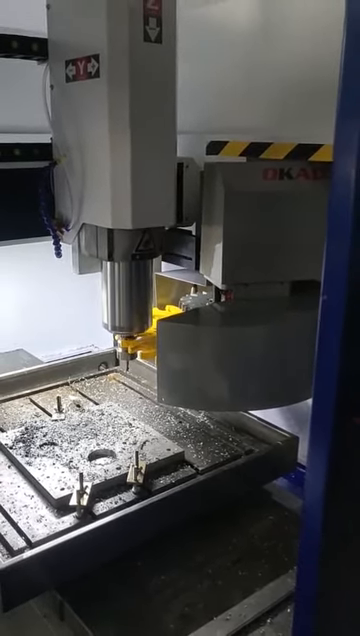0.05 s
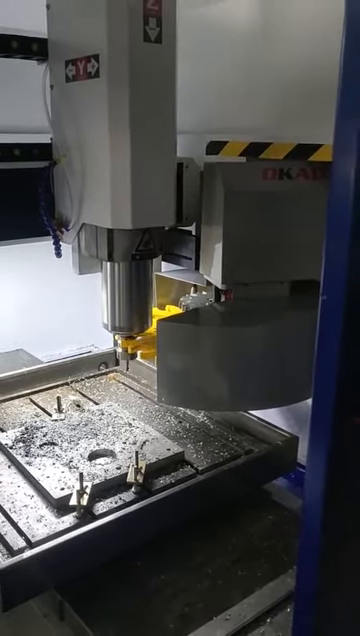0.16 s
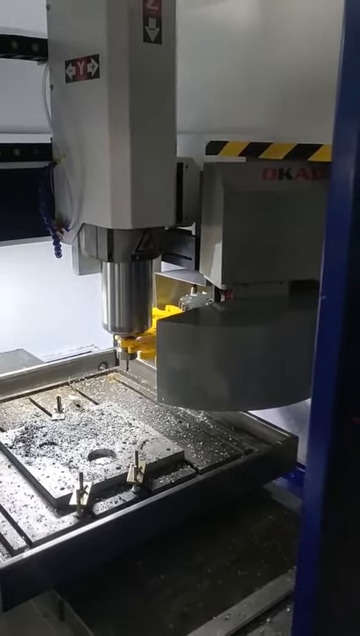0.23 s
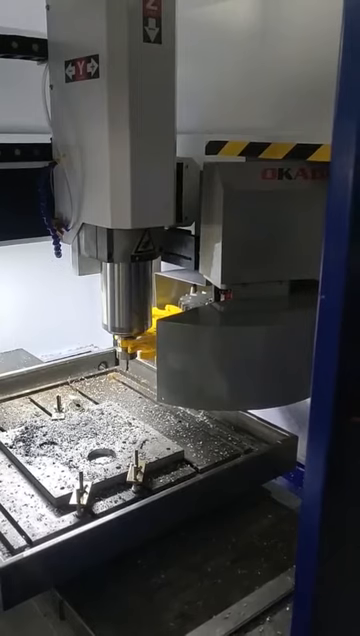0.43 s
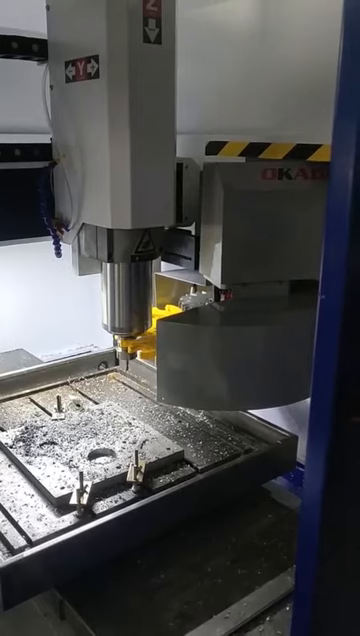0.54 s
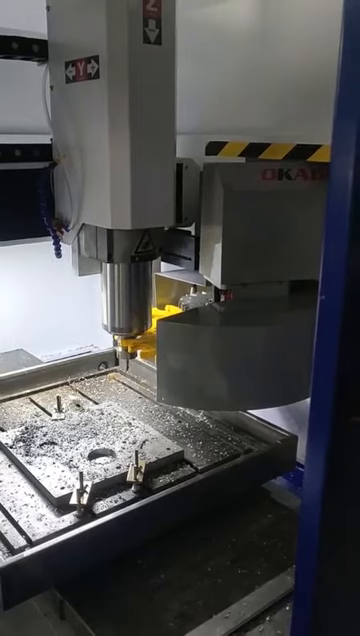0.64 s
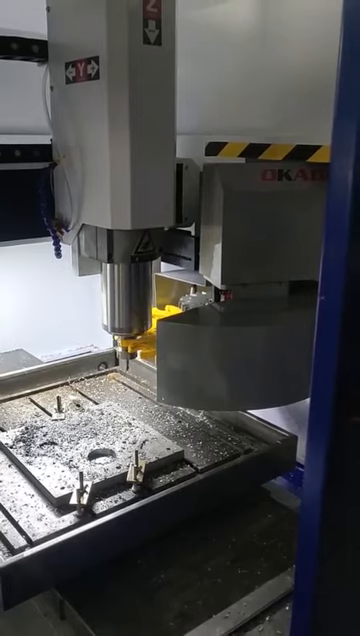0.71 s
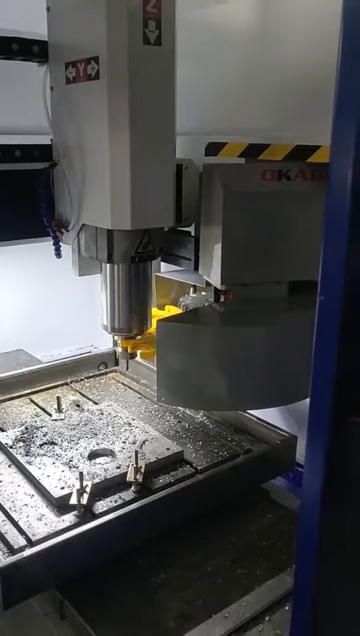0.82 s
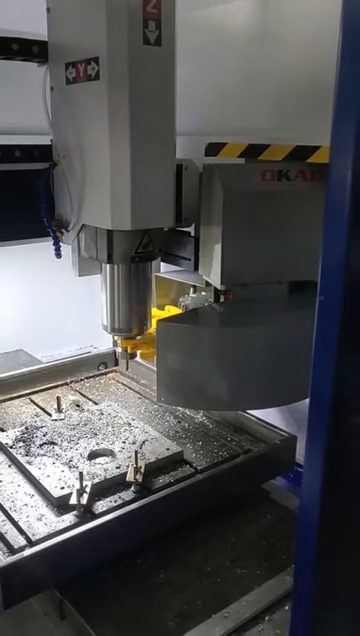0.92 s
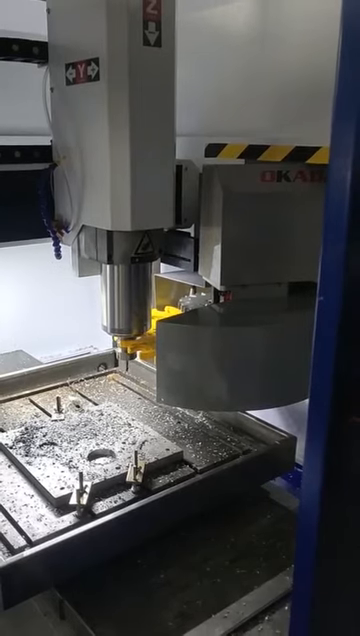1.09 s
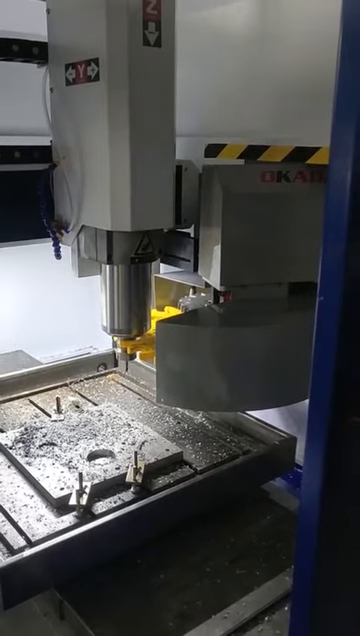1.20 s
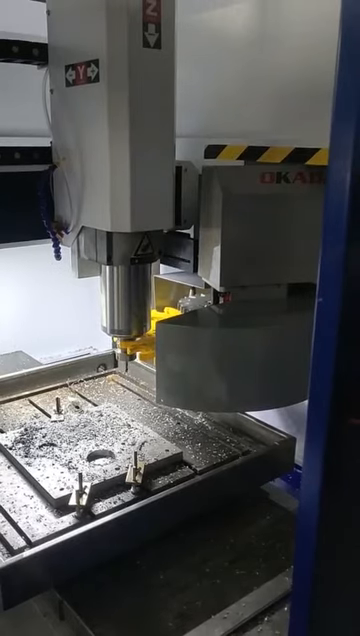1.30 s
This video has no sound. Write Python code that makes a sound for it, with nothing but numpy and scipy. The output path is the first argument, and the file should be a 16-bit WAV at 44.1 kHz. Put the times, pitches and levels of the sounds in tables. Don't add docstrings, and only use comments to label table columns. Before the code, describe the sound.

Over low pump and fan hum and a fading axis drone, a sudden compressed-air burst cracks out and dies quickly with a short room tail, then tiny metal ticks; phone stereo, left side stronger and brighter.

```python
import sys
import numpy as np
from scipy import signal
from scipy.fft import rfft, irfft
from scipy.io import wavfile

SR = 44100
rng = np.random.default_rng(int(sys.argv[2]) if len(sys.argv) > 2 else 0)


def natural_amplitude(level_db):
    exponent = np.asarray(level_db, float) / 20
    return 10 ** exponent


def wav_out(sig):
    wavfile.write(sys.argv[1], SR, np.round(np.clip(np.atleast_2d(sig).T, -1, 1) * 32767).astype(np.int16))


N = 59535
WHINE_HZ = 2868


def rms_one(x):
    return x / np.sqrt(np.mean(x ** 2) + 1e-20)


def at_hz(points, hz):
    p = np.array(points)
    return np.interp(np.log(hz + 1), np.log(p[:, 0]), p[:, 1])


def drift(rate_hz):
    hop = 40
    r = np.exp(-2 * hop * np.pi * rate_hz / SR)
    white = rng.standard_normal(N // hop + 2002)
    slow = signal.lfilter([1], [1, -2 * r, r * r], white)[2000:]
    return np.interp(np.arange(N) / hop, np.arange(len(slow)), rms_one(slow))


def pair():
    # f/Hz, correlation/1
    likeness = [(60, 0.89), (150, 0.96), (290, 0.7), (640, 0.71), (1400, 0.018)]
    mid, side = rfft(rng.standard_normal((2, N)))
    alike = np.clip(at_hz(likeness, np.arange(len(mid)) * SR / N), 0, 1)
    return irfft(np.sqrt(1 + alike) * mid + np.sqrt(1 - alike) * side * [[1], [-1]], N)


def narrow(hz, width_hz):
    r = np.exp(-np.pi * width_hz / SR)
    poles = [1, -2 * r * np.cos(2 * np.pi * hz / SR), r * r]
    once = signal.lfilter([1], poles, pair())
    return rms_one(signal.lfilter([1, 0, -1], poles, once))


def struck(at_s, modes, touch_s):
    t = np.maximum(np.arange(N) / SR - at_s, 0)
    ring = 0
    for hz, db, t60 in modes:
        phase = rng.uniform(0, 1, (2, 1)) * hz / 400
        ring = ring + natural_amplitude(db - 60 * t / t60) * np.sin(2 * np.pi * hz * t + phase)
    return np.clip(t / touch_s, 0, 1) * ring


def banded(spectrum, patchy_db, rate_hz, level_db=lambda hz: 0):
    edges = 22 * 2 ** np.arange(0, 9.8, 1 / 3)
    whites = [pair(), pair()]
    shaped, steady = 0, 0
    for k, (lo, hi) in enumerate(zip(edges, edges[1:])):
        centre = np.sqrt(lo * hi)
        sos = signal.butter(2, [lo, hi], "band", fs=SR, output="sos")
        band = signal.sosfilt(sos, whites[k % 2])
        band = band * natural_amplitude(at_hz(spectrum, centre) + patchy_db * drift(rate_hz))
        shaped = shaped + band * natural_amplitude(level_db(centre))
        steady = steady + band
    return shaped / np.sqrt(np.mean(steady ** 2))


def jet():
    # f/Hz, density level/dB
    jet_colour = [(100, -36), (300, -4), (600, -12.5), (800, -8.5), (2050, -3.5), (3400, 2), (6500, -11),
                  (15800, -11)]
    # f/Hz, bandwidth/Hz, level/dB
    whistles = [(2387, 120, -37), (3120, 150, -55.5), (3900, 150, -39.5), (4953, 33, -44.5)]
    # t/s, level/dB
    air_flow = [
        (0.224, -35),
        (.239, -1.5),
        (.29, -2),
        (.35, -4),
        (0.419, -11),
        (0.521, -19),
        (.6, -29.5),
        (0.699, -49),
        (.8, -75),
    ]
    # f/Hz, share/1
    flow_share = [(500, 1.52), (3000, 0.95), (5000, 0.92), (7000, 0.96), (10300, 0.83), (15000, 1.5)]
    hiss_db, rough_db, treble_lag_s = -24, 1, .006
    t = np.arange(N) / SR
    flow_s, flow_db = np.transpose(air_flow)

    def level_db(hz):
        lag_s = treble_lag_s * np.clip(hz / 6000, 0, 1) ** 2
        return at_hz(flow_share, hz) * np.interp(t - lag_s, flow_s, flow_db)

    air = natural_amplitude(hiss_db) * banded(jet_colour, rough_db, 46.0, level_db)
    for hz, width_hz, db in whistles:
        air = air + natural_amplitude(db + level_db(hz)) * narrow(hz, width_hz)
    return (t > flow_s[0]) * air


def valve():
    # f/Hz, level/dB, t60/s
    body_modes = [(144, -39.5, .06), (330, -25, 0.042), (740, -32, 0.063), (810, -21, 0.032),
                  (1032, -24.5, 0.027), (1263, -33, 0.086)]
    cover_hz = [2347, 2456, 2690, 2847, 3361, 3948]
    # level/dB, t60/s
    cover_ring = [(-16.5, 0.078), (-28.5, .14), (-20.5, .08), (-24, 0.18), (-21.5, 0.35), (-55, 0.033)]
    thump_db, thump_hz, thump_s = -32, 108, .2345
    angle = np.maximum(np.arange(N) / SR - thump_s, 0) * 2 * np.pi * thump_hz
    thump = natural_amplitude(thump_db) * 3 * np.sin(angle) * np.exp(-angle / 2.5)
    body = struck(thump_s + .001, body_modes, 0.00091)
    cover_modes = [(hz, *ring) for hz, ring in zip(cover_hz, cover_ring)]
    return thump + body + struck(thump_s, cover_modes, .014)


def tinks():
    # t/s, f/Hz, level/dB, t60/s
    touches = [(.555, 2330, -54, 0.098), (.695, 2300, -51, 0.092), (0.729, 3900, -56.5, 0.099),
               (0.791, 3370, -64.5, 0.091), (.79, 4100, -56.5, 0.053), (.87, 3760, -65, .06),
               (.935, 4150, -61, .07), (.99, 4180, -60, 0.11), (1.0, 2200, -58, 0.081),
               (1.11, 3900, -61, 0.075), (1.147, 4269, -45, 0.094), (1.15, 4940, -60, .08),
               (1.15, 5300, -63, .07), (1.156, 7000, -68, .06), (1.19, 4260, -65, 0.075),
               (1.22, 4060, -53.5, .06), (1.25, 4330, -58.5, .07)]
    touch_s, pan_db = .008, 7
    ringing = sum(struck(s, [(hz, db, t60)], touch_s) for s, hz, db, t60 in touches)
    return ringing * natural_amplitude(np.array([[0], [-pan_db]]))


def room(x):
    # f/Hz, t60/s
    room_decay = [(100, 1), (800, 0.28), (3000, 0.21), (15000, 0.27)]
    room_db, gap_s = -4, 0.0013
    t = np.arange(N) / SR
    edges = 40 * 2. ** np.arange(9.1) * .9
    white, tail = pair(), 0
    for lo, hi in zip(edges, edges[1:]):
        band = signal.sosfilt(signal.butter(2, [lo, hi], "band", fs=SR, output="sos"), white)
        tail = tail + band * natural_amplitude(-60 * t / at_hz(room_decay, np.sqrt(lo * hi)))
    tail = tail * np.clip(t / gap_s - 1, 0, 1) / np.sqrt(np.sum(tail ** 2) / 2)
    return natural_amplitude(room_db) * signal.fftconvolve(x, tail, axes=1)[:, :N]


def drive():
    # t/s, level/dB
    run_down = [
        (0, -37),
        (.09, -40.5),
        (.2, -37.5),
        (.36, -41),
        (.5, -46),
        (.62, -54),
        (1.35, -88.5),
    ]
    # f/Hz, bandwidth/Hz, level/dB
    drive_bands = [(149.5, 31.4, -5.2), (248.4, 100, -7.5)]
    drone = sum(natural_amplitude(db) * narrow(hz, width_hz) for hz, width_hz, db in drive_bands)
    return natural_amplitude(np.interp(np.arange(N) / SR, *np.transpose(run_down))) * drone


def hum():
    # f/Hz, density level/dB
    hum_colour = [(25, -12.5), (60, -12.5), (184, -0.5), (333, -14), (700, -24.5), (1900, -28),
                  (4200, -34.5), (15800, -65)]
    # f/Hz, bandwidth/Hz, level/dB, left over right/dB
    motor_bands = [(191.5, 58, -53.5, -2), (512.5, 119, -58.5, -3.2), (890.5, 120, -63, 1),
                   (1324.5, 168, -70.5, 9.5), (1532.5, 84, -66.5, 5.5), (1602, 30, -98, -34.5),
                   (WHINE_HZ, 110, -64, 27), (4260, 78, -89, 28), (5266, 64, -96.5, -14),
                   (3898.5, 400.5, -77.5, 11)]
    hum_db, patchy_db = -51.5, 1.1
    rumble = natural_amplitude(hum_db) * banded(hum_colour, patchy_db, 3.5)
    for hz, width_hz, db, pan_db in motor_bands:
        motor = natural_amplitude(db + 1.4 * drift(4.0)) * narrow(hz, width_hz)
        rumble += motor * natural_amplitude(np.array([[0], [-pan_db]]))
    return rumble


def swells():
    # t/s, length/s, f/Hz, bandwidth/Hz, level/dB
    passing = [(0.0067, 0.056, 670, 200, -50), (0.014, 0.054, 1090, 360, -54),
               (.16, 0.046, 1320, 230, -51.5), (0.2, 0.089, 1040, 92, -55), (.04, 0.046, 5300, 35, -76),
               (0.51, 0.17, 1340, 140, -52.5), (1.2, 0.056, 1275, 66, -63.5), (0.507, 0.013, 180, 22, -54),
               (1.044, 0.043, 4800, 84, -79.5), (0.626, 0.11, 367, 140, -58),
               (0.853, 0.1, 1403, 150, -55.5), (.78, 0.048, 943, 140, -57.5), (1.05, .05, 973, 140, -60),
               (1.09, 0.026, 596, 180, -50.5), (1.012, 0.064, 1335, 150, -57.5),
               (1.3, 0.058, 483, 80, -57.5)]
    t, distant = np.arange(N) / SR, 0
    for s, length_s, hz, width_hz, db in passing:
        swell = np.exp(-((t - s) / length_s) ** 2)
        distant = distant + natural_amplitude(db) * swell * narrow(hz, width_hz)
    return distant


def scene():
    rumble_cut = signal.butter(4, 55, "high", fs=SR, output="sos")
    burst = signal.sosfilt(rumble_cut, jet() + valve() + tinks())
    return burst + room(burst) + hum() + drive() + swells()


def band_limit(x):
    return signal.sosfilt(signal.butter(12, 16000, fs=SR, output="sos"), x)


def record(dry):
    # f/Hz, width/octave, level/dB
    left_port = [(620, .15, -8.5), (10040, .25, 8.5)]
    # f/Hz, level/dB
    mic_gap = [(60, 2), (400, 12), (1960, 10), (3200, 10.5), (5500, 5), (8600, 2), (9800, 21.5),
               (15000, 39)]
    hiss_db, ceiling, cutoff_hz = -92, .6, 15600
    hz = np.arange(N // 2 + 1) * SR / N
    port = sum(db * np.exp(-(np.log2((hz + 1) / centre) / octaves) ** 2) for centre, octaves, db in left_port)
    right = port * (hz > 5000) - at_hz(mic_gap, hz)
    x = irfft(rfft(dry) * natural_amplitude(np.array([port, right]) + 3), N)
    x = x + natural_amplitude(hiss_db) * rng.standard_normal(x.shape)
    x = ceiling * np.tanh(x / ceiling)
    x = signal.sosfilt(signal.ellip(12, .5, 70, cutoff_hz, fs=SR, output="sos"), x)
    return band_limit(x)


dry = scene()
out = record(dry)
wav_out(out)
```